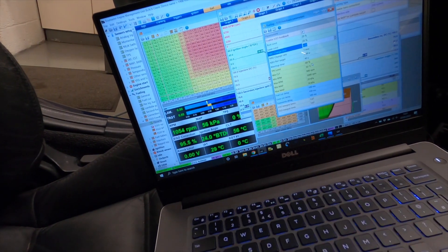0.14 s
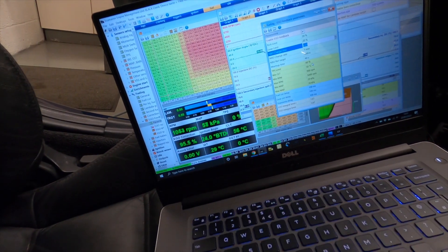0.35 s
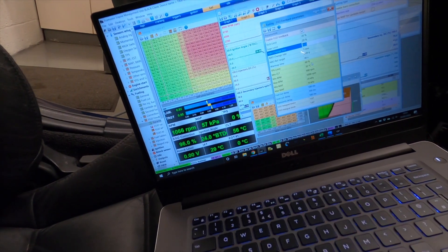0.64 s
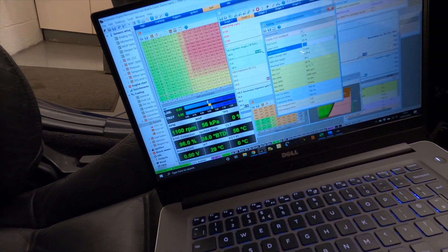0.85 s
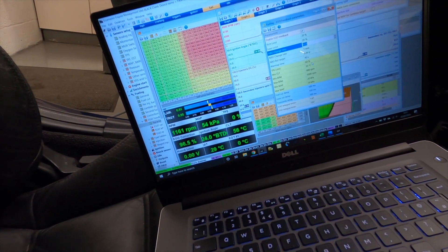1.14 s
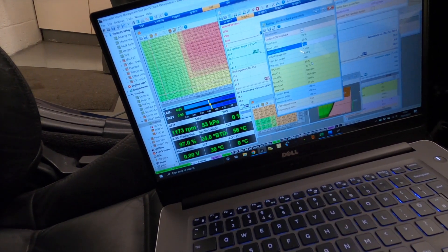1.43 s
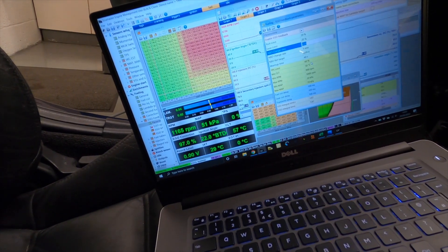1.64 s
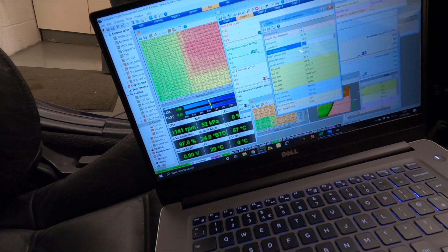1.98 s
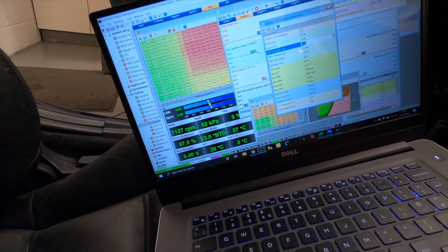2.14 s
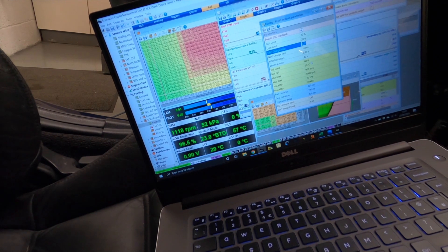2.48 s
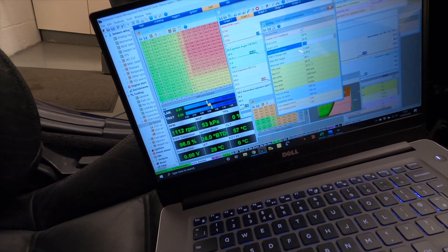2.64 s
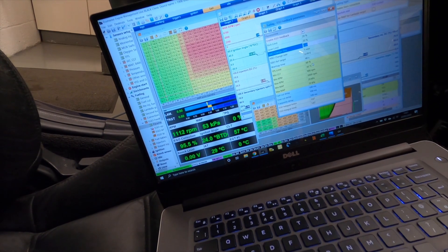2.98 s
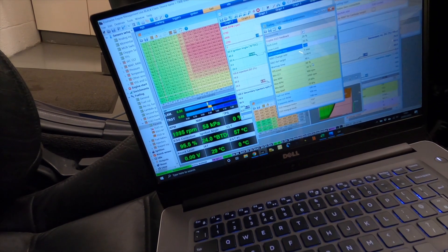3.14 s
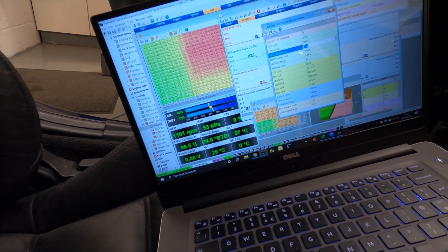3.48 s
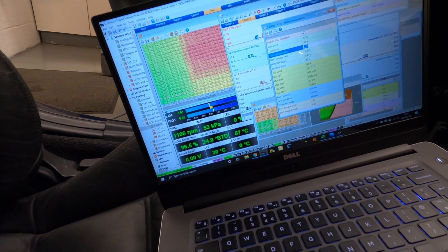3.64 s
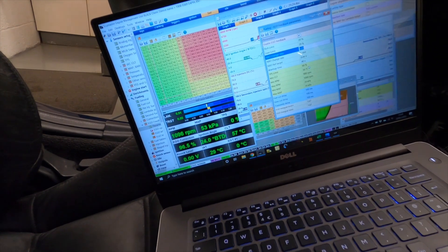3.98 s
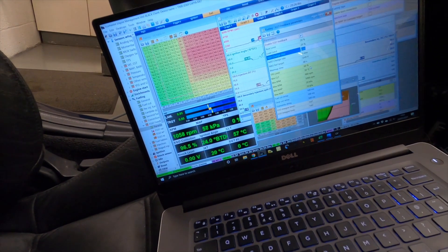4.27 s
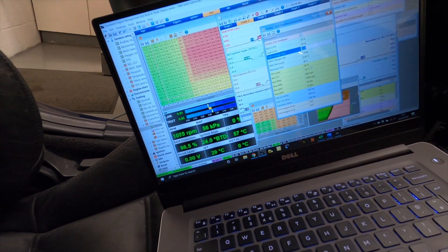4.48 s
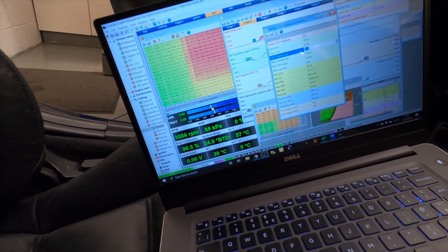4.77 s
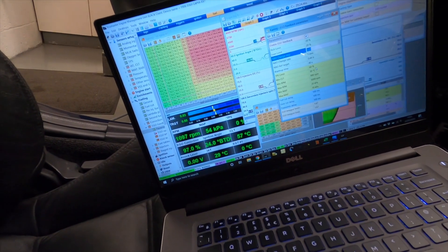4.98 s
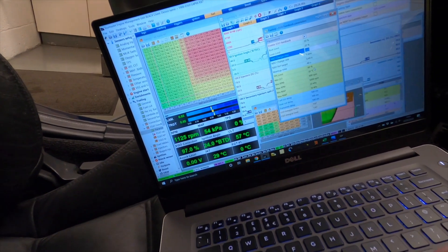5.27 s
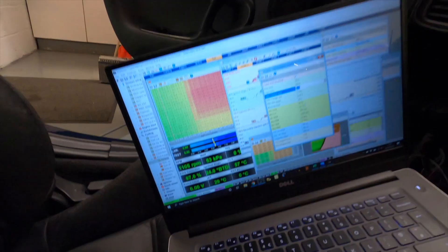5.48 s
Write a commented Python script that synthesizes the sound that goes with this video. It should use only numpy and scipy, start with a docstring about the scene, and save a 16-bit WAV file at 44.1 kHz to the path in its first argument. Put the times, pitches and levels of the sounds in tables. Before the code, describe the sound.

A rotary engine idles with a low droning, slightly uneven throb, over engine-bay hiss and rattle, faint squeaks and a few light clicks.

```python
"""In a garage, a two-rotor engine idles at about 1100 rpm, heard from the seat of the car with the door open.
Its exhaust is a sum of multiples of the firing rate: boom and drone follow cabin-like resonances, a bark sets in
with speed, the idle hunts slowly and lopes after each misfire. Buzzing gas puffs add noise to it.
The engine bay hisses, rattles and whirs as shaped noise and steady tones, something in it squeaks faintly,
and a few light clicks, noise bursts with a ringing tone, sound close by."""
import sys
import numpy as np
from scipy import signal
from scipy.fft import rfft, irfft, next_fast_len
from scipy.io import wavfile
from scipy.ndimage import map_coordinates

SR = 44100
rng = np.random.default_rng(int(sys.argv[2]) if len(sys.argv) > 2 else 0)


def bounce(signal):
    """Save signal as a 16-bit WAV file at the path given by the first command-line argument."""
    frames = np.transpose(np.atleast_2d(signal))
    limited = np.clip(frames, -1, 1)
    pcm = np.round(limited * 32767).astype(np.int16)
    wavfile.write(sys.argv[1], SR, pcm)


N = 247842  # samples

# Mean speed of the engine.
# Each row: time in seconds, firings a second (two for each turn of the shaft).
SPEED = [(0.0, 34.94), (0.2, 34.83), (0.4, 35.4), (0.8, 37.55), (1.0, 39.02), (1.4, 39.23), (2.01, 37.47),
         (2.21, 37.71), (2.81, 37.04), (3.61, 36.61), (3.81, 36.15), (4.01, 34.24), (4.22, 35.39),
         (4.62, 36.45), (5.02, 37.42), (5.62, 36.66)]


def firing_rate():
    """Periodicity: the firings a second set the pitch of every exhaust line."""
    return curves(SPEED)[0]


# slow cycle: firings per cycle, firing at which it surges, firings gained and lost
HUNT_FIRINGS, HUNT_CREST, HUNT_SWING = 12, 9, .015


def hunt(fired):
    """Slow modulation: angle within the cycle of the hunting idle, 0 at each surge."""
    return 2 * np.pi * (fired - HUNT_CREST) / HUNT_FIRINGS


def count_firings():
    """Phase accumulation: the integrated firing rate, swayed by the hunting, counts the firings."""
    fired = 1.18 + np.cumsum(firing_rate()) / SR
    return fired + HUNT_SWING * np.sin(hunt(fired))


# Movement of the idle air valve.
# Each row: time in seconds, opening from 0 to 1.
AIR_VALVE = [(0, 0.7), (.3, 1), (.6, 0.93), (.9, 0.36), (1.4, 0.67), (1.9, 0.2), (3.6, 0.27), (3.9, 0),
             (4.07, 0.62), (4.45, 0.75), (5.0, 0.44), (5.62, 0.23)]


def throttled(shut_db, rise_db):
    """Flow noise: a level in dB that grows in proportion to the opening of the air valve."""
    return shut_db + rise_db * curves(AIR_VALVE)[0]


# Low noise of the shaken cabin.
# Each row: frequency in Hz, relative spectral density in dB per Hz.
RUMBLE = [(12, -10), (28, -36), (55, 2.5), (100, 10.5), (200, 4), (300, -13.5), (600, -45.5), (1200, -71)]
BARK_SHIFT_DB = 1.2  # loss of the 3rd multiple for each firing a second above BARK_FROM


def exhaust_note(fired):
    """Harmonic synthesis: the silencer passes the lowest multiples, aligned in one suction dip per firing."""
    speed = firing_rate()
    boom, bark, drone, lope = burn(fired)
    note = -boom * np.cos(4 * np.pi * fired)

    # the bark nears a pipe resonance as the speed rises and falls behind the boom
    bark_angle = 2 * np.pi * (fired - .008 * (speed - 37))
    first, third, fourth = -np.cos(np.outer([1, 3, 4], bark_angle))
    third = third * amp(-BARK_SHIFT_DB * np.maximum(speed - BARK_FROM, 0))
    note += amp(-41.5) * first
    note += bark * (amp(-14) * first + amp(1.8) * third + amp(0.47) * fourth)

    # the drone trails each dip by about half a firing
    drone_angle = 2 * np.pi * (fired - .56)
    note -= drone * (np.cos(5 * drone_angle) + .45 * np.cos(4 * drone_angle))

    # unequal rotors add lines halfway between those of the firings
    note += lope * (amp(-2.5) * np.sin(3 * np.pi * fired) - amp(-16) * np.cos(5 * np.pi * fired))
    note += drone * amp(-11) * (np.sin(5 * np.pi * fired) + np.sin(9 * np.pi * fired))

    # uneven burning shakes the cabin, more so while the engine lopes
    shake = (amp(-40) + amp(-16) * lope) * air(colour(RUMBLE))
    return stumble(note, cabin_hz=55, pipe_hz=98, t60=0.24) + shake


# boom and drone swell as the 2nd and 5th multiples of the firing rate pass through a resonance
BOOM_HZ, BOOM_WIDTH_HZ, BOOM_DB = 71.9, 7.2, -8.4
DRONE_HZ, DRONE_WIDTH_HZ = 176, 8.2
DRONE_SHUT_DB, DRONE_RISE_DB = -24, 3.5  # at resonance: air valve shut, added by full opening
# bark and lope set in around a speed (firings a second), from a soft to a hard level
BARK_FROM, BARK_SPAN, BARK_SOFT_DB, BARK_HARD_DB = 36.7, 0.43, -30.5, -16.5
LOPE_FROM, LOPE_SPAN, LOPE_SOFT_DB, LOPE_HARD_DB = 37, .7, -28, -17.8
HUNT_DB, HUNT_BARK_DB = 0.5, 0.8  # the boom swells with each surge, the bark a quarter cycle later
HUNT_LOPE_DB, LOPE_SCATTER_DB = 2.5, 1.6  # the lope grows between surges, and varies by chance
UPSET_LAG_S, UPSET_SPREAD_S = 0.037, 0.041  # the upset crests just after a misfire and passes quickly
# a full upset adds this lope and changes boom and bark (the drone as the bark)
UPSET_LOPE_DB, UPSET_BOOM_DB, UPSET_BARK_DB = -11.5, -9.5, -3.5


def burn(fired):
    """Resonance and threshold: speed sets the gains of boom, bark, drone and lope, misfires upset them."""
    t, speed = np.arange(N) / SR, firing_rate()
    upset = 0
    for s, _, _, size in MISFIRES:
        upset = upset + size * np.exp(-.5 * ((t - s - UPSET_LAG_S) / UPSET_SPREAD_S) ** 2)

    boom_db = BOOM_DB + HUNT_DB * np.cos(hunt(fired)) + UPSET_BOOM_DB * upset
    boom = amp(boom_db) * peak(2 * speed, BOOM_HZ, BOOM_WIDTH_HZ)

    bark_db = BARK_SOFT_DB + (BARK_HARD_DB - BARK_SOFT_DB) * sets_in(speed, BARK_FROM, BARK_SPAN)
    bark_db += HUNT_BARK_DB * np.sin(hunt(fired)) + UPSET_BARK_DB * upset + 0.67 * wobble(7.9)

    drone_db = throttled(DRONE_SHUT_DB, DRONE_RISE_DB) + UPSET_BARK_DB * upset
    drone = amp(drone_db) * peak(5 * speed, DRONE_HZ, DRONE_WIDTH_HZ)

    lope_db = LOPE_SOFT_DB + (LOPE_HARD_DB - LOPE_SOFT_DB) * sets_in(speed, LOPE_FROM, LOPE_SPAN)
    lope_db += LOPE_SCATTER_DB * wobble(9) - HUNT_LOPE_DB * np.cos(hunt(fired))
    return boom, amp(bark_db), drone, amp(lope_db) + amp(UPSET_LOPE_DB) * upset


# Weak or missed firings.
# Each row: time in seconds, share of the note lost, thud in dB before its rise and decay, upset from 0 to 1.
MISFIRES = [(1.659, .3, -20, 1), (1.975, .4, -12, .8), (2.29, .4, -27, .95), (3.789, 1, -9, .35),
            (3.872, .59, -22, .6), (3.955, .18, -18, .15), (3.988, .7, -29, .3), (5.42, .22, -23, .65)]


def stumble(note, cabin_hz, pipe_hz, t60):
    """Free vibration: a missed firing leaves a hole, and cabin and pipe ring at their own pitches."""
    for s, lost, db, _ in MISFIRES:
        t = np.arange(N) / SR - s
        after = np.maximum(t, 0)
        ring = np.sin(2 * np.pi * cabin_hz * after) + amp(-7) * np.sin(2 * np.pi * pipe_hz * after)
        thud = amp(db - 60 * after / t60) * (1 - np.exp(-after / .009)) * ring
        hole = lost * np.exp(-(t / .009) ** 2)
        note = note * (1 - hole) + thud
    return note


# Resonances of the pipe heard in the firing buzz.
# Each row: frequency in Hz, relative level in dB.
PIPE = [(200, 8), (225, 1.5), (240, -5.5), (260, -0.5), (315, -10), (352, -7), (385, -7), (408, -15),
        (433, -3.5), (475, -18.5), (515, -7), (570, -20), (660, -12), (730, -28)]
# Noise of the escaping gas.
# Each row: frequency in Hz, relative spectral density in dB per Hz.
GAS = [(100, -20.5), (190, 4.5), (260, -11), (330, -6.5), (440, -7), (510, -10), (570, -22.5), (655, -16),
       (730, -25), (1000, -22), (2000, -79.5)]
PUFF_SHUT_DB, PUFF_RISE_DB = -36, 3.5  # air valve shut, added by full opening; shared by buzz and gas
# around this speed (firings a second) the puffs grow louder and their buzz brighter
RASP_FROM, RASP_SPAN, RASP_PIVOT_HZ = 38.3, .3, 300
RASP_DB, RASP_DB_PER_OCTAVE = 2, 2.5


def exhaust_puffs(fired):
    """Source and filter: the opening ports buzz through the pipe's resonances, with puffs of gas."""
    speed = firing_rate()
    rasp = sets_in(speed, RASP_FROM, RASP_SPAN)
    puff_db = throttled(PUFF_SHUT_DB, PUFF_RISE_DB) + RASP_DB * rasp + .8 * wobble(11)

    buzz = np.zeros(N)
    for order in range(11, 37):  # multiples of the shaft rate
        hz = order / 2 * speed
        # odd shaft orders, which come from the difference between the rotors, are weaker
        db = along(PIPE, hz) - 8 * (order % 2) + 1.5 * wobble(3)
        db += RASP_DB_PER_OCTAVE * rasp * np.log2(hz / RASP_PIVOT_HZ)
        angle = np.pi * order * fired + rng.uniform(0, 2 * np.pi) + .12 * wobble(8)
        buzz += amp(db) * np.sin(angle)

    # the gas pulses once a turn and once a firing
    gate_db = 1.6 * np.cos(np.pi * (fired - .35)) + 2 * np.cos(2 * np.pi * (fired - .3))
    gate = amp(gate_db + 1.3 * wobble(37))
    gas = unit(gate) * air(colour(GAS))
    return amp(puff_db) * (amp(1.2) * unit(buzz) + amp(-3) * gas)


# Noise of the clatter, and below it of the hiss.
# Each row of both: frequency in Hz, relative spectral density in dB per Hz.
BAY = [(350, -32), (600, -0.5), (661, -1), (714, -8), (967, -3.5), (1080, -1.5), (1220, -1), (1530, -5),
       (2140, -3.5), (2560, -14.5), (2800, -12.5), (3640, -54), (6160, -120)]
HISS = [(1410, -25), (2400, -0.5), (2570, -9.5), (3010, 1.5), (4420, -2.5), (4910, -1.5), (5330, -2),
        (5970, -2.5), (6680, -4.5), (7650, -5.5), (8250, -7), (12300, -15.5), (13600, -23), (14500, -39)]
# Rattling covers, and below them the metal in the bay; a later power sharpens both responses.
# Each row of both: frequency in Hz, width in Hz, relative level in dB, the last two before sharpening.
PANELS = [(1082, 43, 0), (1198, 73, -1.5), (1340, 33, -9), (1950, 62, -3), (2190, 21, -3.5)]
METAL = [(2970, 75, 4.5), (3197, 32, 0), (3766, 84, 3), (4735, 31, 7), (4960, 160, 2), (5960, 44, 5.5)]
# Tones of fan and pumps.
# Each row: mean frequency in Hz, mean rms level in dB.
WHINES = [(297, -42), (1206, -57.5), (1458, -58.5), (1791, -59.5), (2977, -59), (4758, -69)]
# air valve shut, added by full opening
CLATTER_SHUT_DB, CLATTER_RISE_DB = -39.5, 1.5
HISS_SHUT_DB, HISS_RISE_DB = -45, 4.5


def engine_bay(fired):
    """Modulated noise and resonance: clatter and hiss flutter with the shaft, covers and metal ring, fans whine."""
    clatter_db = throttled(CLATTER_SHUT_DB, CLATTER_RISE_DB)
    hiss_db = throttled(HISS_SHUT_DB, HISS_RISE_DB)
    flutter_db = .5 * np.cos(np.pi * (fired - .45))  # once a turn

    clatter_gain = amp(clatter_db + 0.37 + .5 * flutter_db + 0.44 * wobble(45))
    clatter = clatter_gain * cabin(air(colour(BAY)), t60=0.15)

    rattle_gain = amp(clatter_db - 14.0 + 3.0 * wobble(21.8))
    rattle = rattle_gain * air(lambda hz: np.abs(resonances(PANELS)(hz)) ** 2)

    hiss_gain = amp(hiss_db + flutter_db + 0.76 * wobble(24.94) + 0.43 * wobble(5.8))
    hiss = hiss_gain * air(colour(HISS))

    ring_gain = amp(hiss_db - 8.5 + 1.9 * wobble(8.8))
    ring = ring_gain * air(lambda hz: np.abs(resonances(METAL)(hz)) ** 1.7)

    whine = np.zeros((2, N))
    for hz, db in WHINES:
        angle = 2 * np.pi * np.cumsum(hz + 3 * wobble(14)) / SR
        waver_db = 1.3 * np.array([wobble(4.5), wobble(5)])  # each ear on its own
        whine += amp(db + waver_db) * np.sqrt(2) * np.sin(angle)
    return clatter + rattle + hiss + ring + whine


def cabin(x, t60):
    """Reverberation: dense short reflections between seats, glass and door, scaled to rms 1."""
    t = np.arange(SR // 5) / SR
    tail = rng.standard_normal(len(t)) * amp(-60 * t / t60)
    tail = tail[None] / np.linalg.norm(tail)
    reflected = signal.fftconvolve(x, tail, axes=1)[:, :N]
    return unit(x + amp(-8) * reflected)


# Resonances of the squeak, sharpened by a later power.
# Each row: frequency in Hz, width in Hz, relative level in dB, the last two before sharpening.
SQUEAL = [(7115, 60, -7), (7385, 70, 0), (7612, 45, 0), (7728, 45, 0), (8150, 300, -15)]
# Flares of the squeak.
# Each row: centre in seconds, level in dB before the pulsing, Gaussian spread in seconds.
SQUEAKS = [(.26, -45, 0.048), (.38, -46, .025), (0.827, -48, 0.082), (1.44, -48, .022), (2.23, -48, .018),
           (2.71, -49, 0.014), (2.928, -45.5, 0.029), (3.358, -45.5, 0.033), (4.257, -48, 0.043),
           (4.372, -45, .025), (4.638, -41.5, 0.025), (4.86, -50, 0.12)]


def squeak(fired):
    """Friction: a thin rubbing sound, perhaps the belt, pulses once a turn and flares up now and then."""
    t = np.arange(N) / SR
    flares = sum(amp(db) * np.exp(-.5 * ((t - s) / spread) ** 2) for s, db, spread in SQUEAKS)
    steady = amp(throttled(HISS_SHUT_DB, HISS_RISE_DB) - 13 + 1.5 * wobble(10))
    rub = np.hypot(steady, flares)
    pulse = amp(1.7 * np.cos(np.pi * (fired - .45)))
    return rub * pulse * air(lambda hz: np.abs(resonances(SQUEAL)(hz)) ** 1.24)


# Light clicks close by.
# Each row: start in seconds, initial level in dB before the gains of burst and ring.
CLICKS = [(.083, -25.5), (.442, -28.3), (2.555, -29.8), (5.068, -35), (5.497, -35)]
# Noise of the click's burst.
# Each row: frequency in Hz, relative spectral density in dB per Hz.
CLICK_BODY = [(400, -30), (800, -12), (1020, -2), (1350, -2), (1740, -1), (2190, 3), (2550, -14),
              (3100, -9), (4500, -15), (7000, -32), (14000, -55)]
CLICK_HZ, CLICK_RING_DB, CLICK_BURST_DB = 2150, -5.5, -.7  # ring of the hollow body, noisy burst


def clicks():
    """Impact: small plastic contacts, each a brief burst ringing in a hollow body."""
    t, t60 = np.arange(N) / SR, .1
    decays = sum((t >= s) * amp(db - 60 * np.abs(t - s) / t60) for s, db in CLICKS)
    burst = amp(CLICK_BURST_DB) * air(colour(CLICK_BODY))
    ring = amp(CLICK_RING_DB) * np.sin(2 * np.pi * CLICK_HZ * t)
    return decays * (burst + ring)


# Likeness of the two ears in noise.
# Each row: frequency in Hz, left-right correlation from 0 to 1.
ALIKE = [(60, 0.65), (120, 0.97), (240, 0.97), (470, 0.7), (920, 0.8), (1830, 0.63), (3630, 0.42),
         (7190, 0.11), (14200, 0.01)]


def air(response):
    """Diffuse field: stereo noise alike in the bass and unrelated in the treble, its shared part of rms 1."""
    def split(hz):
        turn = np.arccos(np.clip(along(ALIKE, hz), 0, 1)) / 2
        return response(hz) * [np.cos(turn), np.sin(turn)]
    mid, side = filtered(rng.standard_normal((2, N)), split)
    return np.array([mid + side, mid - side]) / np.std(mid)


# Level difference of the ears.
# Each row: frequency in Hz, left minus right in dB.
LEAN = [(60, -1.2), (90, -0.5), (150, 0.5), (370, 1), (680, 2), (1250, 2.5), (2300, 3.5), (4220, 1.5),
        (7750, 0.4), (14200, -1)]
# Phase difference of the ears.
# Each row: frequency in Hz, lead of the left ear in radians.
LEAD = [(30, 0.32), (75, 0.34), (150, 0.24), (400, 0.16), (1000, 0.13)]


def two_ears(sound):
    """Binaural cues: level and phase differ between the ears with frequency."""
    sides = np.array([[.5], [-.5]])
    return filtered(sound, lambda hz: amp(sides * along(LEAN, hz)) * np.exp(1j * sides * along(LEAD, hz)))


def peak(hz, centre_hz, width_hz):
    """Resonance: the gain of one mode, 1 at its centre."""
    return 1 / np.hypot(1, 2 * (hz - centre_hz) / width_hz)


def sets_in(speed, start, span):
    """Soft threshold: a logistic step from 0 to 1, halfway at start."""
    return 1 / (1 + np.exp((start - speed) / span))


def resonances(modes):
    """Modal superposition: the summed response of (Hz, width Hz, dB) resonances."""
    return lambda f: sum(amp(db) * 1j * f * w / (c * c - f * f + 1j * f * w) for c, w, db in modes)


def colour(points):
    """Minimum phase: a causal response with the gains of (Hz, dB) points, by folding the cepstrum."""
    def response(hz):
        cepstrum = irfft(np.log(amp(along(points, hz)) + 1e-6))
        half = len(cepstrum) // 2
        return np.exp(rfft(np.r_[cepstrum[0], 2 * cepstrum[1:half], np.zeros(half)]))
    return response


def filtered(x, response):
    """Linear filtering: the spectrum of x times a complex response of frequency."""
    m = 2 * next_fast_len(N // 2 + SR // 4)
    return irfft(rfft(x, m) * response(np.fft.rfftfreq(m, 1 / SR)), m)[..., :N]


def wobble(rate):
    """Random modulation: a smooth curve through random knots, rate knots a second."""
    knots = rng.standard_normal(int(N * rate / SR) + 4)
    return map_coordinates(knots, [np.arange(N) * rate / SR])


def curves(rows):
    """Linear interpolation: one value per sample for each column after the time."""
    s, *cols = np.transpose(rows)
    return [np.interp(np.arange(N) / SR, s, c) for c in cols]


def along(points, hz):
    """Logarithmic pitch scale: (Hz, value) points interpolated over log frequency."""
    f, v = np.transpose(points)
    return np.interp(np.log(hz + 1), np.log(f + 1), v)


def amp(db):
    """Level: decibels to amplitude gain."""
    return 10 ** (np.asarray(db) / 20)


def unit(x):
    """Effective value: scale to rms 1."""
    return x / np.sqrt(np.mean(x ** 2) + 1e-20)


def scene():
    """Superposition: one shaft drives the engine's sounds, and the clicks join them."""
    fired = count_firings()
    engine = exhaust_note(fired) + exhaust_puffs(fired) + engine_bay(fired) + squeak(fired)
    return two_ears(engine + clicks())


def record(dry):
    """Band limitation: an ideal low-pass keeps nothing from 14400 Hz upward."""
    return filtered(dry, lambda hz: hz < 14400)


dry = scene()
out = record(dry)
bounce(out)
```